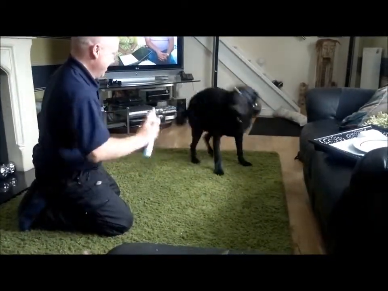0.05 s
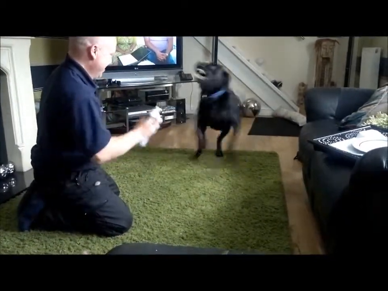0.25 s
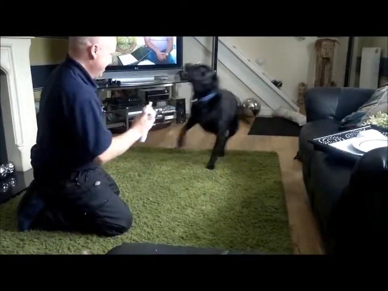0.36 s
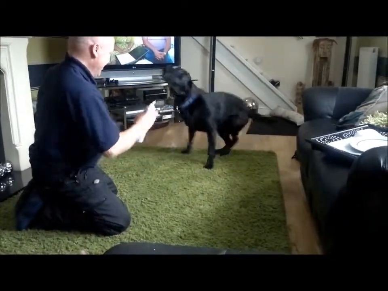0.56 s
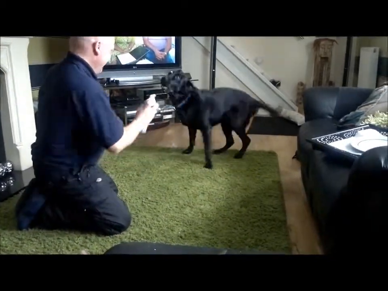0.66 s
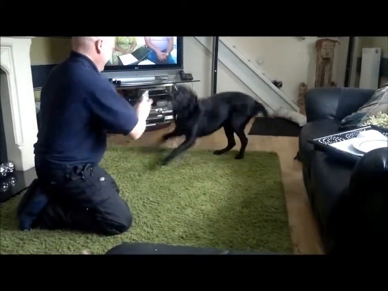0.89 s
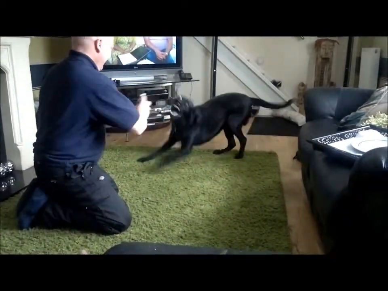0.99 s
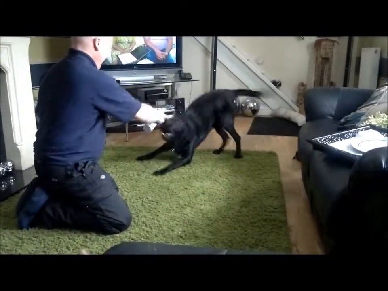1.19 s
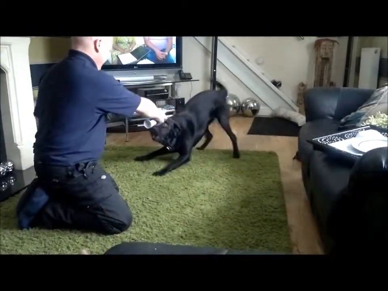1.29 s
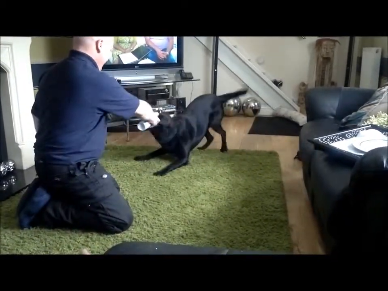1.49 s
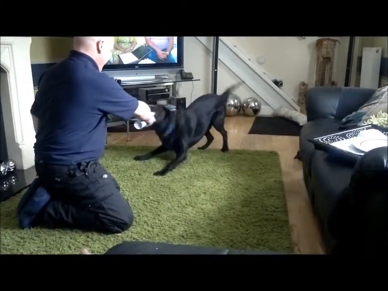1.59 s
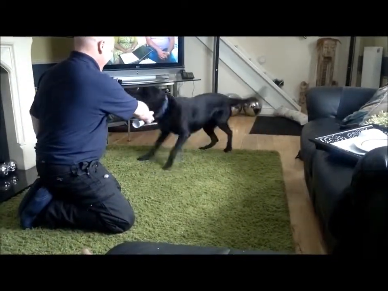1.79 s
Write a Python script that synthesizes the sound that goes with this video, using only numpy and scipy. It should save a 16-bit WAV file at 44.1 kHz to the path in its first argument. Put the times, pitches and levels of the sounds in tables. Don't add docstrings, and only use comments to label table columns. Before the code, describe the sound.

A large dog draws a raspy breath and barks loudly, breathes in again and barks a second time, paws thudding on a rug over wood, then scuffs and sniffs; close microphone in a lightly echoing living room.

```python
import sys
import numpy as np
from scipy import signal
from scipy.fft import rfft, irfft, next_fast_len
from scipy.io import wavfile
from scipy.ndimage import uniform_filter1d, minimum_filter1d, map_coordinates

SR = 44100
rng = np.random.default_rng(int(sys.argv[2]) if len(sys.argv) > 2 else 0)


def to_wav(s):
    ch = np.atleast_2d(s).T
    pcm = np.round(np.clip(ch, -1, 1) * 32767)
    wavfile.write(sys.argv[1], SR, pcm.astype(np.int16))


def gain_from_decibels(decibels):
    exponent = np.asarray(decibels, float) / 20
    return 10 ** exponent


N = 81585

# hz, density_db
HUSH = [(25, -23.5), (60, -10), (150, -18.5), (400, -11.5), (1500, -13.5), (3000, -35), (12000, -59)]
HUSH_DB = -62

# start_s, peak_s, end_s, level_db
BREATHS = [
    (-0.1, 0.092, 0.59, -42.5),
    (0.68, 0.833, 0.91, -47.5),
    (0.69, .86, 0.875, -50),
    (-.1, 0.0067, .12, -63.5),
]
# hz, density_db
BREATH_SPECTRA = [
    [(120, -71), (200, -18.5), (404, -4), (559, -15.5), (663, -5), (815, -18.5), (1620, -11.5), (4290, -39),
     (12000, -50.5), (15600, -93), (22000, -120)],
    [(200, -35), (500, -4), (750, -13.5), (2000, -7.5), (2800, -17.5), (6000, -34), (12000, -63)],
    [(2200, -21), (3200, -2), (4000, 2.5), (4600, -13), (7000, -18.5), (9000, -22), (14000, -60)],
    [(2500, -53), (3300, -6.5), (3900, -2.5), (4800, -33.5), (12000, -56.5)],
]

# start_s, level_db, t60_s
SCUFFS = [
    (.003, -40.5, 0.041),
    (1.497, -37, 0.063),
    (1.514, -53.5, 0.36),
    (1.544, -54.5, 0.46),
    (1.575, -46, 0.044),
    (1.622, -47.5, 0.37),
    (1.644, -39.5, 0.063),
    (1.685, -51, 0.18),
    (1.719, -60, .2),
]
# hz, density_db
RUG = [(88, -92), (150, -14.5), (408, -13), (472, -10), (546, -19.5), (599, -18), (3500, -23.5),
       (4550, -31), (7700, -120)]
GRAIN_DB = 3

# start_s, level_db, floor_pitch_hz, t60_s
THUDS = [(.005, -54.5, 50.5, 0.52), (0.138, -46.5, 45.4, 0.2), (0.203, -29, 66.2, 0.58),
         (0.224, -13, 62.4, 0.2), (0.303, -20, 65.7, 0.12), (.345, -34.5, 39.5, 0.23),
         (0.842, -31, 80, 0.61), (0.97, -28, 69, 0.076), (1.002, -30, 50.4, 0.29), (1.071, -34, 75.7, 0.13),
         (1.157, -39.5, 57.4, 0.44), (1.253, -45.5, 65.2, 0.15), (1.491, -57.5, 50, 0.78),
         (1.55, -60, 49.9, 0.22), (1.599, -47.5, 56.4, 0.194), (1.648, -45.5, 53.4, 0.13),
         (1.728, -46, 59, 0.096), (1.747, -37, 58.2, 0.12)]
# hz, density_db
PUFF = [(25, -18.5), (60, 5.5), (150, -5.5), (280, 1.5), (400, -22), (700, -49)]
THUD_RISE_S, BOARD_RATIO, BOARD_DB, PUFF_DB = 0.006, 2.1, -9, -6

# start_s, level_db
TICKS = [
    (.155, -43),
    (1.52, -41),
]
# hz, density_db
CLAW = [(5000, -63), (7000, -6), (11500, 13), (13500, -43)]

# time_s, pitch_hz, level_db, roughness_0_1, mouth_opening_0_1
BARK_ONE = [
    (.23, 252, -31, 0, 0.5),
    (.243, 259.2, -7.5, 0.42, 0.11),
    (.27, 282.1, -0.5, 0.3, 0.18),
    (.279, 431.7, -12, 0.3, 1),
    (.297, 459, -10, 0.59, 0.86),
    (.315, 505, -10.5, 0.36, 1),
    (.35, 495.8, -14.5, 0.25, 0.45),
    (.378, 469.6, -22, 0.31, 0.38),
    (.42, 339.3, -23.5, 0.08, 0.46),
]
BARK_TWO = [
    (.934, 263.3, -43, 0.16, .3),
    (.947, 274.9, -24.5, 0.3, 0.25),
    (.963, 344.7, -17, 0.34, 0.62),
    (.98, 428.5, -9, 0.49, 0.92),
    (.998, 480, -13.5, 0.087, 1),
    (1.03, 512.6, -11, 0.073, 0.77),
    (1.068, 520.4, -21.5, 0.37, 1),
    (1.09, 414.6, -16, 0.09, 0.19),
    (1.145, 258.8, -35, 0.096, 0.46),
]
# centre_hz, width_hz, level_db
THROAT_ONE = [(514, 317, 4.5), (878, 177, 0), (1785, 423, -1), (2193, 68, -1), (4374, 1400, -18.5),
              (5480, 1000, -12.5), (3140, 1600, -35)]
# centre_hz, width_hz, level_db
THROAT_TWO = [(480, 195, 7), (972, 78, 4), (1728, 464, 1), (2077, 225, 2), (4374, 400, -15.5),
              (5650, 880, -11.5), (3060, 900, -36)]
# start_s, rise_s, hold_s, t60_s, level_db
AIR = [
    (0.233, 0.062, 0.048, .3, -12.5),
    (0.995, .022, 0.025, .45, -20),
]
# cutoff_hz, level_db, odd_partials_db (below DOUBLING_HZ)
SHUT = [
    (605, 6.5, -16),
    (480, 9, 4),
]
JITTER, SHIMMER_DB = 0.006, 1.2
DOUBLING_HZ, PULSE_TOP_HZ = 300, 2403
RASP_DB, RASP_LOW_HZ, HISS_LIFT_DB = 10.5, 520, 1.5
CHEST_HZ, EDGE_HZ, EDGE_LEAK_DB = 204, 5300, -10
SHUT_DAMPING, SHUT_LEAK_HZ, LEAK_WIDTH_HZ, LEAK_DB = 0.71, 4470, 600, -5
BARK_GAIN = 1.205

# start_s, rise_s, hold_s, t60_s, pitch_hz, level_db
UNDERTONES = [
    (.941, 0.011, 0.015, 0.064, 408.7, -20),
    (0.945, 0.02, 0.009, 0.056, 998, -17),
]

# start_s, level_db
SNIFFS = [
    (1.43, -49.5),
    (1.598, -41.5),
    (1.761, -42),
]
# hz, density_db
NOSE = [(1200, -67.5), (1900, -9.5), (2600, -12.5), (3900, 0), (4800, -5), (6500, -15.5), (11500, -20),
        (15500, -38)]
SNIFF_RISE_S, SNIFF_HOLD_S, SNIFF_T60_S, FLUTTER_DB = 0.0025, 0.013, 0.46, 1.5

# hz, t60_s
ROOM = [(100, 0.5), (500, 0.57), (2000, 0.45), (6000, 0.48), (11000, 0.36)]
# hz, likeness_0_1
ALIKE = [(100, 1), (600, 0.89), (1500, 0.033), (4000, 0.15)]
# pitch_hz, level_db, t60_s
RINGS = [
    [(487, -9.5, 0.33), (505, -5.5, 0.54), (990, -6, 0.41)],
    [(1030, -16, 0.57), (802, -12, .4), (1013, -10.5, 0.4), (988, -8, .55)],
]
WET_DB, FLOOR_WET_DB, WALLS_DB, FIRST_WALL_S = -3, -25, -10, 0.004

# hz, left_over_right_db
BALANCE_DB = [(60, -2.5), (500, -4.5), (1000, -2.5), (3000, 1), (12000, -1.8)]
LAG_S = 0.00015
MIC_LOW_HZ, MIC_HIGH_HZ, TOP_HZ = 40, 11880, 15740
LIMIT, LIMIT_HOLD_S = 0.97, 0.004


def unit(x):
    return x / np.sqrt(np.mean(x ** 2) + 1e-20)


def along(points, hz):
    f, v = np.transpose(points)
    return np.interp(np.log(hz + 1), np.log(f + 1), v)


def wobble(rate_hz):
    knots = rng.standard_normal(int(N * rate_hz / SR) + 4)
    return map_coordinates(knots, [np.arange(N) * rate_hz / SR])


def filtered(x, response):
    m = next_fast_len(N + SR // 2)
    return irfft(rfft(x, m) * response(np.fft.rfftfreq(m, 1 / SR)), m)[..., :N]


def noise(spectrum):
    return unit(filtered(rng.standard_normal(N), lambda hz: gain_from_decibels(along(spectrum, hz))))


def swell(start_s, rise_s, hold_s, t60_s):
    t = np.arange(N) / SR - start_s
    return np.clip(t / rise_s, 0, 1) * gain_from_decibels(-60 * np.clip(t - rise_s - hold_s, 0, None) / t60_s)


def room_hush():
    return gain_from_decibels(HUSH_DB) * np.array([noise(HUSH), noise(HUSH)])


def breaths():
    t = np.arange(N) / SR
    out = np.zeros(N)
    for (start, peak, end, db), spectrum in zip(BREATHS, BREATH_SPECTRA):
        ramp = np.interp(t, [start, peak, end], [0, 1, 0])
        out += gain_from_decibels(db + 0.51 * wobble(40)) * ramp * noise(spectrum)
    return out


def scuffs():
    bursts = sum(gain_from_decibels(db) * swell(s, 0.003, 0, t60) for s, db, t60 in SCUFFS)
    return noise(RUG) * gain_from_decibels(GRAIN_DB * wobble(190)) * bursts


def thuds():
    t = np.arange(N) / SR
    puff = gain_from_decibels(PUFF_DB) * np.array([noise(PUFF), noise(PUFF)])
    out = np.zeros((2, N))
    for s, db, hz, t60 in THUDS:
        floor = np.sin(2 * np.pi * hz * (s - t))
        board = gain_from_decibels(BOARD_DB) * np.sin(2 * np.pi * BOARD_RATIO * hz * (t - s))
        out += gain_from_decibels(db) * swell(s, THUD_RISE_S, THUD_RISE_S, t60) * (floor + board + puff)
    return out


def claws():
    return noise(CLAW) * sum(gain_from_decibels(db) * swell(s, 0.00029, 0, 0.0217) for s, db in TICKS)


def fold_pulses(pitch_hz, phase, odd_db, before_release):
    order = np.arange(1, 31)[:, None]
    doubling = gain_from_decibels(odd_db * (order % 2) * (pitch_hz < DOUBLING_HZ) * before_release)
    rolloff = 1 + (order * pitch_hz / PULSE_TOP_HZ) ** 4
    return unit((np.cos(order * phase) * doubling / rolloff).sum(axis=0)) * gain_from_decibels(SHIMMER_DB * wobble(160))


def rasp_response(f):
    hiss = 1 + gain_from_decibels(HISS_LIFT_DB) * (f > PULSE_TOP_HZ)
    return gain_from_decibels(RASP_DB) / (1 + (RASP_LOW_HZ / (f + 1)) ** 6) * hiss


def throat_response(f, tract):
    total = 0
    for k, (centre, width, db) in enumerate(tract):
        sign = (-1) ** max(k, 1)
        total = total + sign * gain_from_decibels(db) * 1j * f * width / (centre * centre - f * f + 1j * f * width)
    chest = (1j * f / (CHEST_HZ + 1j * f)) ** 3
    return total * chest * (gain_from_decibels(EDGE_LEAK_DB) + 1 / (1 + (f / EDGE_HZ) ** 12))


def shut_response(f, shut_hz, shut_db):
    muffle = gain_from_decibels(shut_db) / (1 + 2j * SHUT_DAMPING * f / shut_hz - (f / shut_hz) ** 2) ** 2
    return muffle + gain_from_decibels(LEAK_DB) / (1 + ((f - SHUT_LEAK_HZ) / LEAK_WIDTH_HZ) ** 4)


def bark(rows, tract, air, closed):
    s, *columns = np.transpose(rows)
    t = np.arange(N) / SR
    pitch_hz, db, rough, mouth = [np.interp(t, s, c) for c in columns]
    rough, mouth = np.clip(rough, 0, 1), np.clip(mouth, 0, 1)
    shut_hz, shut_db, odd_db = closed
    jitter = 1 + JITTER * (1 + 4 * rough) * wobble(130)
    phase = 2 * np.pi * np.cumsum(pitch_hz * jitter) / SR

    pulses = fold_pulses(pitch_hz, phase, odd_db, t < s[-2])
    rasp = filtered(unit(rng.standard_normal(N) * (1 + np.cos(phase)) ** 2), rasp_response)
    voiced = (t > s[0]) * (t < s[-1])
    folds = voiced * gain_from_decibels(db) * (np.sqrt(1 - rough ** 2) * pulses + rough * rasp)

    gated = unit(rng.standard_normal(N) * (2 + np.cos(phase)))
    *shape, air_db = air
    rush = gain_from_decibels(air_db) * swell(*shape) * filtered(gated, lambda f: f > PULSE_TOP_HZ)

    opened = filtered(folds * mouth + rush, lambda f: throat_response(f, tract))
    shut = filtered(folds * (1 - mouth),
                    lambda f: throat_response(f, tract) * shut_response(f, shut_hz, shut_db))
    return BARK_GAIN * (opened + shut)


def undertones():
    t = np.arange(N) / SR
    out = np.zeros(N)
    for s, rise, hold, t60, hz, db in UNDERTONES:
        level = gain_from_decibels(db + SHIMMER_DB * wobble(118.8))
        out += level * swell(s, rise, hold, t60) * np.sin(2 * np.pi * hz * (t - s))
    return out


def sniffs():
    bursts = sum(gain_from_decibels(db) * swell(s, SNIFF_RISE_S, SNIFF_HOLD_S, SNIFF_T60_S) for s, db in SNIFFS)
    return noise(NOSE) * gain_from_decibels(FLUTTER_DB * wobble(48)) * bursts


def room(x, rings):
    hz, t, z = signal.stft(rng.standard_normal((2, SR)), SR, nperseg=256)
    turn = np.arccos(np.clip(along(ALIKE, hz), -1, 1))[:, None] / 2
    mid, side = z[0] * np.cos(turn), z[1] * np.sin(turn)
    decay = gain_from_decibels(-60 * t / along(ROOM, hz)[:, None])
    tail = signal.istft(np.array([mid + side, mid - side]) * decay, SR, nperseg=256)[1]
    tail = tail / np.linalg.norm(tail[0])
    answer = gain_from_decibels(WET_DB) * np.pad(tail, ((0, 0), (round(FIRST_WALL_S * SR), 0)))

    age = np.arange(SR // 2) / SR
    for ring_hz, db, t60 in rings:
        energy_norm = np.sqrt(np.log(1000) * 4 / t60 / SR)
        answer[:, :SR // 2] += gain_from_decibels(db - 60 * age / t60) * np.sin(2 * np.pi * ring_hz * age) * energy_norm / 10

    walls = rng.random((8, 3))
    taps = (SR * (0.003 + 0.025 * walls[:, 0])).astype(int)
    answer[:, taps] += gain_from_decibels(WALLS_DB) * (walls[:, 1:].T * 2 - 1)
    return signal.fftconvolve(x[None], answer, axes=1)[:, :N]


def scene():
    sides = np.array([[1], [-1]])
    small = breaths() + scuffs() + sniffs()
    floor = thuds()
    first = bark(BARK_ONE, THROAT_ONE, AIR[0], SHUT[0])
    second = bark(BARK_TWO, THROAT_TWO, AIR[1], SHUT[1]) + undertones()
    direct = filtered(first + second + small + claws() + floor,
                      lambda hz: np.exp(1j * np.pi * hz * LAG_S * sides))
    echo = room(first, RINGS[0]) + room(second, RINGS[1])
    echo += room(small + gain_from_decibels(FLOOR_WET_DB) * floor.mean(axis=0), [])
    balanced = filtered(direct + echo, lambda hz: gain_from_decibels(along(BALANCE_DB, hz) / 2 * sides))
    return balanced + room_hush()


def roll_off(x):
    return signal.sosfilt(signal.butter(12, 15740, fs=SR, output="sos"), x)


def record(dry):
    def mic_response(hz):
        low_cut = 1j * hz / (MIC_LOW_HZ + 1j * hz)
        return low_cut / (1 + (hz / MIC_HIGH_HZ) ** 4) * (hz < TOP_HZ)

    mic = filtered(dry, mic_response)
    span = round(LIMIT_HOLD_S * SR)
    wanted = np.minimum(1, LIMIT / (np.abs(mic).max(axis=0) + 1e-9))
    gain = uniform_filter1d(minimum_filter1d(wanted, 2 * span), span)
    return roll_off(mic * gain)


dry = scene()
out = record(dry)
to_wav(out)
```